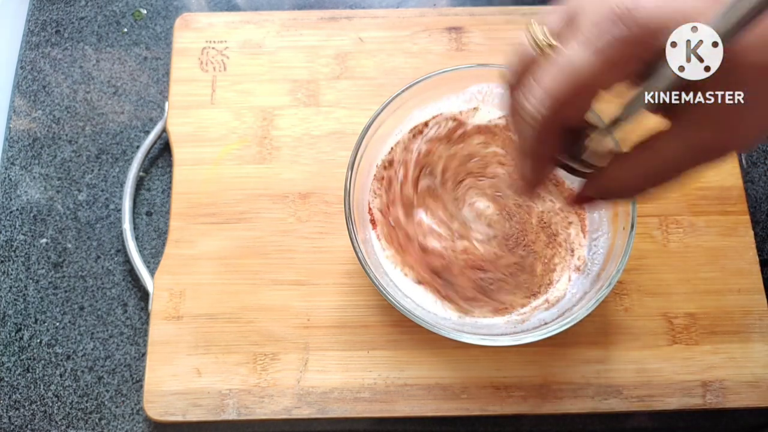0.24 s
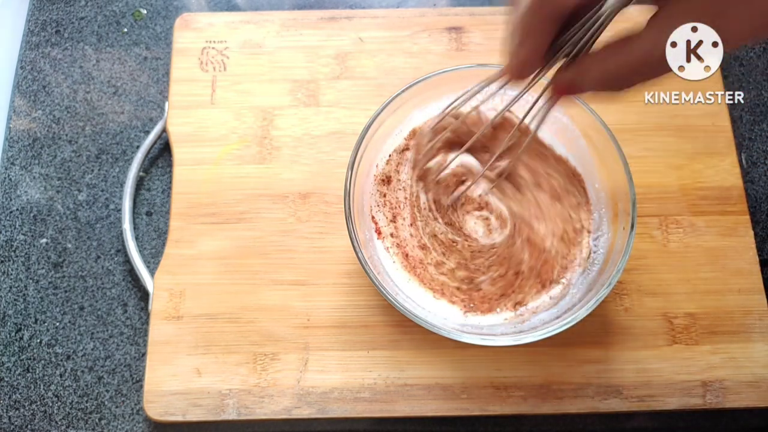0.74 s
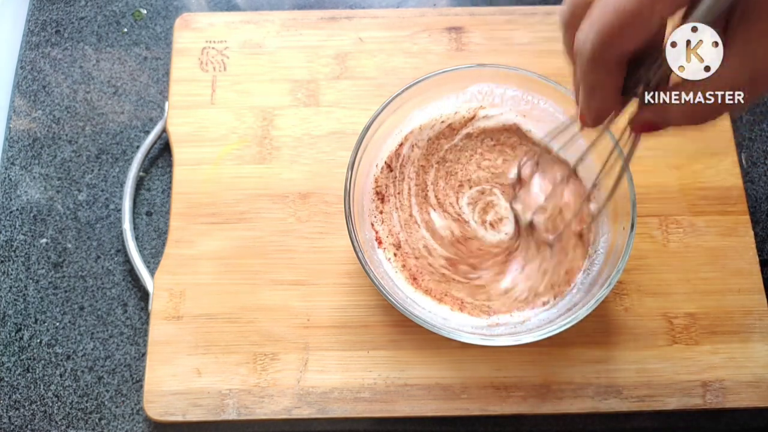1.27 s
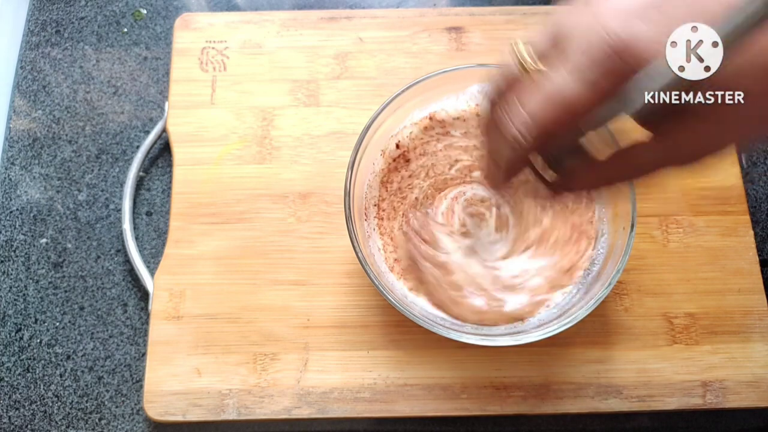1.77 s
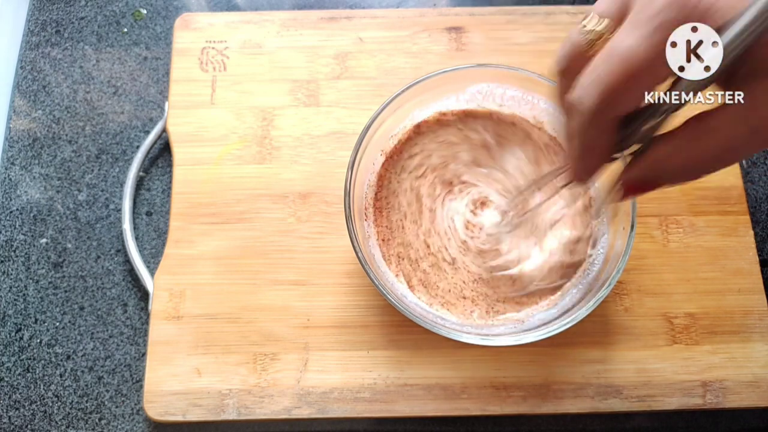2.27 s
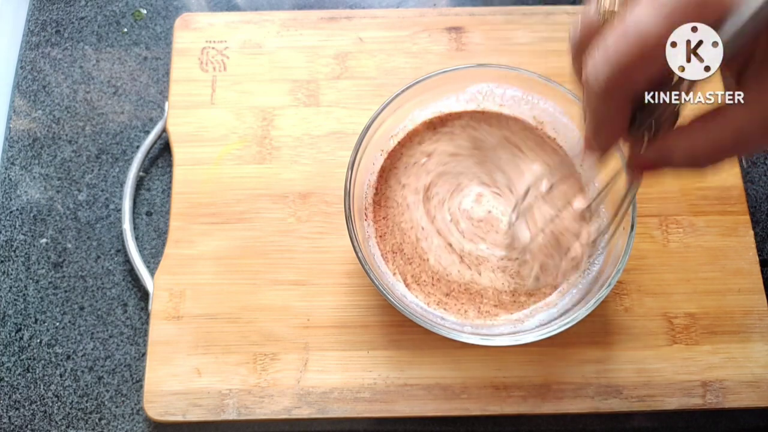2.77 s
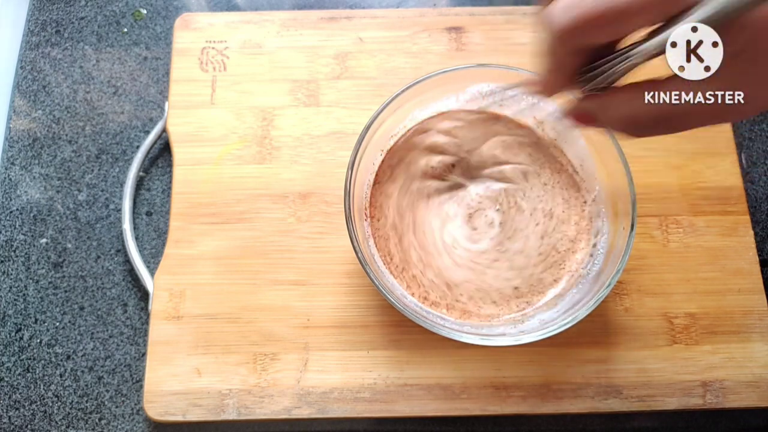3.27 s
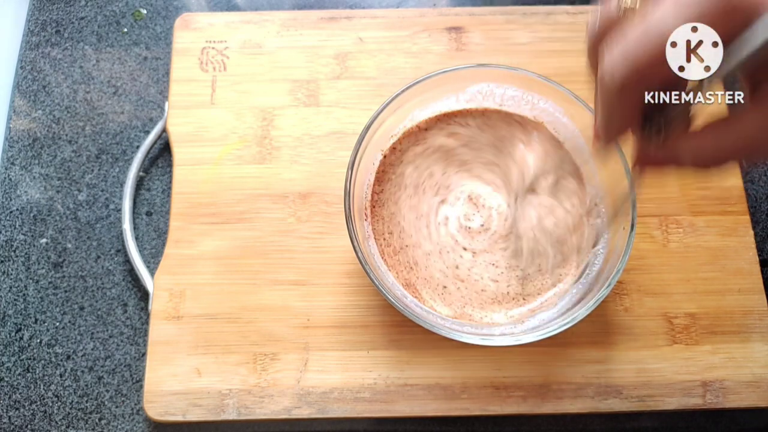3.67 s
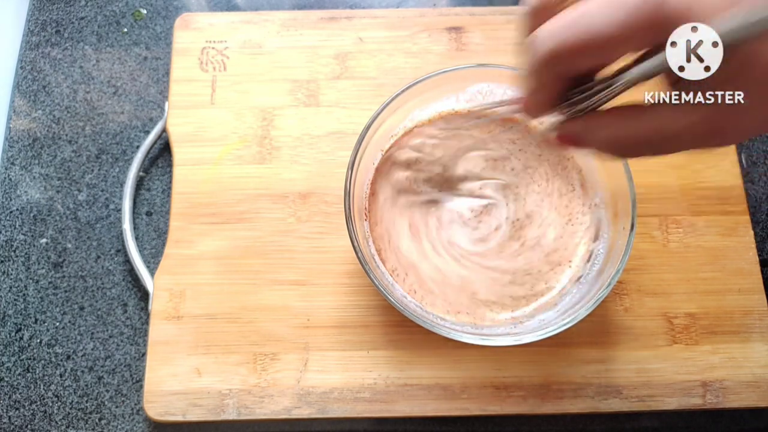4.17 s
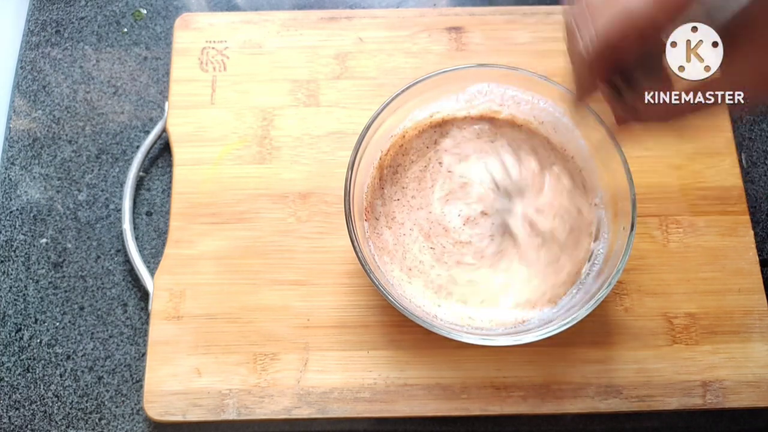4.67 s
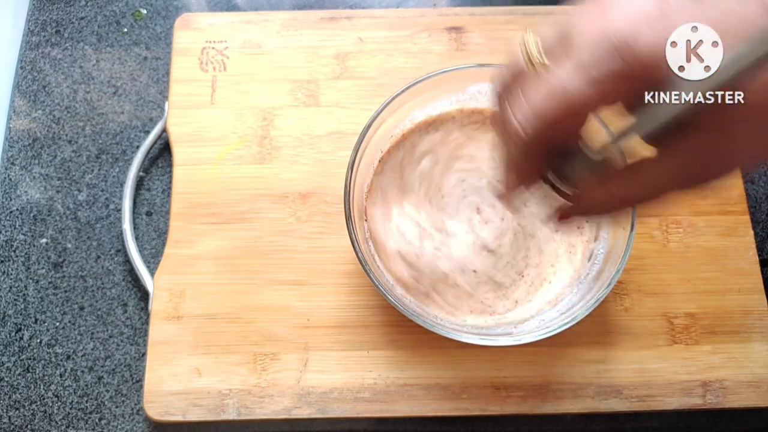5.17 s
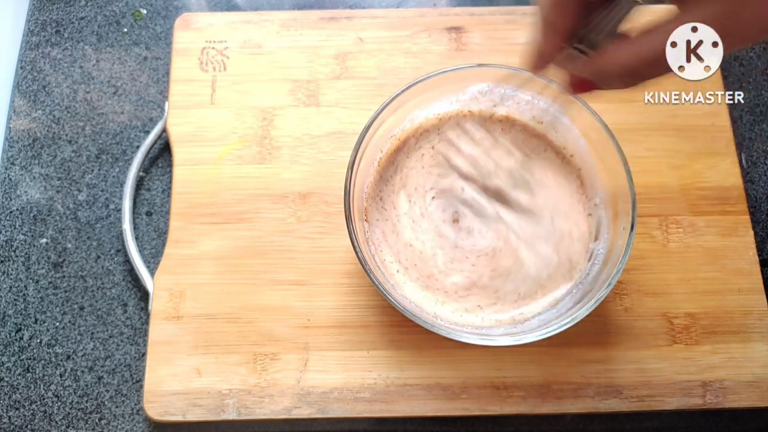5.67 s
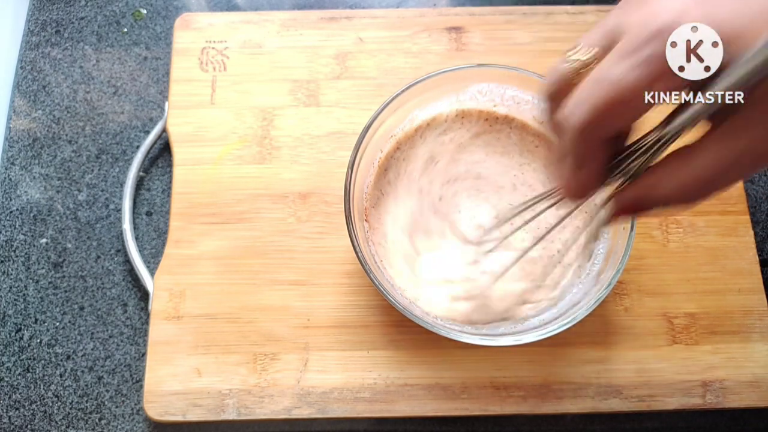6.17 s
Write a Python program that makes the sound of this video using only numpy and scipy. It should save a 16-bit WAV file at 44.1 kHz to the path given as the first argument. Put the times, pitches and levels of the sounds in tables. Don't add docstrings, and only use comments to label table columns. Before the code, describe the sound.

A phone-like stereo microphone close to a glass bowl catches quick, uneven whisking: light brushes, sharp metallic ticks, duller belly knocks and thin wire scraping. Short clear glass rings overlap the damped thuds of the board underneath. Taps are lighter in the middle, then strongest around five seconds, and carry on to the end over a low, pulsing kitchen hum and a brief far motor.

```python
import sys
import numpy as np
from scipy import signal
from scipy.fft import rfft, irfft, next_fast_len
from scipy.io import wavfile
from scipy.ndimage import uniform_filter1d

SR = 44100
rng = np.random.default_rng(int(sys.argv[2]) if len(sys.argv) > 2 else 0)


def inscribe(sig):
    pcm = np.round(np.clip(np.atleast_2d(sig).T, -1, 1) * 32767)
    wavfile.write(sys.argv[1], SR, pcm.astype(np.int16))


def voltage_ratio(decibels):
    exponent = np.asarray(decibels, float) / 20
    return 10 ** exponent


N = 283601
TIME = np.arange(N) / SR

# start_s, tick_db, knock_db, main_ring_db, third_ring_db
RIM_STRIKES = [(0.8939, -29.5, -29, -34.5, -37), (1.0465, -35.5, -34, -47, -43.5),
               (1.0929, -70, -51.5, -43, -47.5), (1.1857, -40.5, -33.5, -36.5, -51),
               (2.0133, -27, -33.5, -34, -42), (2.141, -46.5, -38, -37.5, -38.5),
               (2.9921, -41, -43.5, -46, -68), (3.5381, -40.5, -51, -81, -54.5),
               (3.5922, -51, -39.5, -55, -54), (3.7364, -34.5, -45, -73, -58),
               (3.8327, -49.5, -42, -45.5, -46.5), (4.5106, -41, -35, -41.5, -54),
               (4.7716, -46.5, -45, -45, -48.5), (4.9187, -25, -29, -30, -34.5),
               (4.9285, -37, -31, -35, -36.5), (5.2395, -23.5, -30.5, -27.5, -34),
               (5.2475, -44, -32, -24, -41.5), (5.3976, -57, -47, -42, -44.5),
               (5.5707, -29, -36, -39.5, -35), (6.044, -51, -51.5, -63, -46),
               (6.097, -40, -40.5, -39, -52.5), (6.2118, -30.5, -39.5, -39, -41),
               (6.3355, -52, -43, -48, -48), (6.4112, -39, -47, -36, -58)]
# start_s, tick_db, knock_db, main_ring_db, third_ring_db
BELLY_STRIKES = [(0.5886, -46.5, -40, -40.5, -66), (0.7372, -54, -46, -37.5, -55),
                 (0.752, -53, -52, -38.5, -43.5), (1.3733, -49, -52.5, -45, -67),
                 (1.44, -77, -57, -51.5, -78), (1.5519, -36, -40, -37.5, -48),
                 (1.7744, -45, -55.5, -47.5, -58), (1.8861, -57, -49.5, -52, -78),
                 (2.3037, -45.5, -42, -44.5, -56), (2.4109, -40.5, -37.5, -44.5, -41),
                 (2.5745, -39, -48, -41.5, -57), (4.0582, -34.5, -49, -44.5, -47),
                 (4.1041, -50, -58, -57, -58), (4.1255, -31.5, -47.5, -42, -39.5),
                 (4.1934, -49.5, -47, -47.5, -53), (4.6019, -38.5, -43.5, -52, -72),
                 (4.8294, -71, -52, -55, -59), (5.1053, -29, -36, -37, -32.5),
                 (5.7573, -44.5, -51, -65, -44)]


def tone(x, table, column=1):
    rows, size = np.array(table, float), next_fast_len(N)
    hz = np.maximum(np.fft.rfftfreq(size, 1 / SR), 1)
    gain_db = np.interp(np.log(hz), np.log(rows[:, 0]), rows[:, column])
    return irfft(rfft(x, size) * voltage_ratio(gain_db), size)[:N]


def unit(x):
    return x / np.sqrt(np.mean(np.abs(x) ** 2))


def smooth_twice(x, size):
    return uniform_filter1d(uniform_filter1d(x, size), size)


def sine(hz, phase=0):
    return np.sqrt(2) * np.sin(2 * np.pi * hz * TIME + phase)


def ring(x, hz, t60):
    pole = np.exp((2j * np.pi * hz - np.log(1000) / t60) / SR)
    return signal.lfilter([1], [1, -pole], x, axis=-1)


def blows(times, sizes):
    x = np.zeros((2, N), complex)
    x[:, np.clip((times * SR).astype(int), 0, N - 1)] = sizes
    return x


def walk(rate):
    hold = int(SR / rate)
    steps = np.repeat(rng.standard_normal(N // hold + 1), hold)
    return 0.83 * smooth_twice(steps, hold)[:N]


def spin(count, spread):
    common, apart = rng.standard_normal((count, 2)).T
    return np.exp(1j * (9 * common + spread * apart * np.array([[.5], [-.5]])))


def throb_level():
    # peak_s, level_db
    swells = [(0.07, -59), (0.25, -53.5), (0.41, -53), (0.64, -56), (0.82, -63), (1.02, -55), (1.23, -55.5),
              (1.45, -51.5), (1.65, -56), (1.86, -48.5), (2.58, -49.5), (2.76, -54), (2.89, -54),
              (3.08, -50), (3.23, -58), (3.6, -55), (3.78, -59), (4.12, -55), (4.5, -57.5), (4.75, -48),
              (5.1, -58), (5.57, -50), (5.96, -49.5), (6.14, -55.5)]
    rest_db, swell_s = -59, 0.055
    return voltage_ratio(rest_db) + sum(voltage_ratio(db) * np.exp(-((TIME - s) / swell_s) ** 2) for s, db in swells)


def kitchen():
    # pitch_hz, level_db (per Hz)
    rumble_colour = [(25, -22), (45, -14.5), (70, -3.5), (150, 2), (330, -4.5), (480, -10), (660, -20.5),
                     (960, -17), (1700, -27), (2600, -36.5)]
    # pitch_hz, level_db, width_hz
    hum_lines = [(194.7, -71.5, 15), (297, -59.5, 4.1), (339.9, -58, 14.4), (436, -68, 0.88)]
    # time_s, level_db
    motor_swell = [
        (2.05, -84),
        (2.14, -52.5),
        (2.49, -52),
        (2.6, -74),
    ]
    # pitch_hz, level_db
    motor_lines = [(488.8, -63), (732.5, -78)]

    mid, side = (tone(rng.standard_normal(N), rumble_colour) for _ in range(2))
    side = tone(side, [(100, -12.0), (250, -15.5), (500, 2.5), (900, 1.0)])
    rumble_level = voltage_ratio(-50.5 + 1.0 * walk(4.1))
    out = rumble_level * (mid + side * np.array([[1], [-1]])) / np.std(mid)
    for hz, db, width_hz in hum_lines:
        narrow = unit(ring(rng.standard_normal(N), hz, 2.3 / width_hz))
        out += np.sqrt(2) * voltage_ratio(db) * narrow.real
    out += voltage_ratio(np.interp(TIME, *np.transpose(motor_swell))) * sine(194.5)
    out += throb_level() * voltage_ratio(-0.9) * sine(99, 1.4 * walk(7))
    for hz, db in motor_lines:
        out += voltage_ratio(db + 0.76 * walk(4.4)) * sine(hz, 0.26 * walk(3.73))
    return out


def thumps():
    # start_s, level_db
    bumps = [(0.588, -35.5), (0.893, -35.5), (1.186, -44), (2.014, -35), (2.141, -38.5), (2.302, -37.5),
             (2.409, -48), (3.736, -34), (4.058, -36.5), (4.51, -38), (4.919, -40), (5.106, -54),
             (5.239, -43), (5.568, -50), (6.211, -58)]
    # pitch_hz, level_db, t60_s
    board_modes = [(351, -3, 0.086), (610, -13.5, 0.034)]
    s, db = np.transpose(bumps)
    return sum(voltage_ratio(over_db) * ring(blows(s, voltage_ratio(db)), hz, t60).imag for hz, over_db, t60 in board_modes)


def touches():
    # start_s, tick_db, knock_db, main_ring_db
    ruled_taps = [(0.0005, -60, -45.5, -34), (0.066, -51.5, -45, -43.5), (0.402, -52, -55.5, -81),
                  (0.4698, -46.5, -53, -53), (0.7003, -49, -69, -59), (1.499, -61, -66, -55),
                  (1.9584, -47, -71, -67), (2.2439, -44, -54, -48), (2.5187, -47.5, -46, -76),
                  (2.6938, -78, -77.5, -49.5), (2.7965, -45, -49, -91), (3.0964, -45.5, -73, -74),
                  (3.1892, -47.5, -68, -86), (3.2588, -44.5, -66, -45.5), (3.3867, -44.5, -60, -63),
                  (3.697, -48, -69.5, -73), (3.7776, -47.5, -80.5, -63), (4.005, -44, -63, -75),
                  (4.285, -50, -59, -53.5), (5.022, -45.5, -48, -45), (5.0649, -66, -55, -49),
                  (5.0848, -59, -70, -42.5), (5.346, -42.5, -54, -38.5), (5.4969, -77, -59.5, -46.5),
                  (5.5403, -57, -60.5, -44), (5.7309, -41.5, -44.5, -48), (5.8541, -53, -51, -53)]
    rim_low_db, belly_low_db, ruled_low_db = -14.5, -4, -16
    ruled_third_db = -13.5
    rows = []
    for strikes, low_db in ((RIM_STRIKES, rim_low_db), (BELLY_STRIKES, belly_low_db)):
        for s, tick, knock, main, third in strikes:
            rows.append((s, tick, knock, knock + low_db, main, third))
    for s, tick, knock, main in ruled_taps:
        rows.append((s, tick, knock, knock + ruled_low_db, main, main + ruled_third_db))
    return np.transpose(sorted(rows))


def wire_grit():
    # pitch_hz, level_db (per Hz)
    grit_colour = [(400, -11), (900, 4), (2200, 10), (3500, 3), (4100, 0), (5200, 2), (16000, 1)]
    return unit(np.array([tone(rng.standard_normal(N), grit_colour) for _ in range(2)]))


def scrape_level():
    # time_s, scrape_db
    stir = [(0, -55), (.43, -61), (.8, -58.5), (.99, -55.5), (1.3, -57.5), (1.66, -58.5), (1.97, -59),
            (2.2, -55), (2.76, -60.5), (3.13, -60.5), (3.33, -59), (3.72, -60.5), (4.24, -58.5),
            (4.44, -67.5), (4.78, -57.5), (5.2, -54.5), (5.94, -60), (6.32, -56)]
    stir_db = np.interp(TIME, *np.transpose(stir))
    return voltage_ratio(stir_db + 0.99 * walk(12) + 3.0 * walk(60))


def slips(rate, spread_db):
    when, size = rng.random((int(rate * N / SR), 2)).T
    puffs = blows(when * N / SR, voltage_ratio(-spread_db * np.log(1 - size)))
    return uniform_filter1d(ring(puffs, 0, 0.016).real, size=30)


def scraping(grit, scrape):
    return scrape * grit * (voltage_ratio(3) + voltage_ratio(-31) * slips(9.1, 4.0))


def rolled(s, sizes, soft, hz):
    roll_s = .0035
    step = np.round(roll_s * hz) / hz
    first = blows(s, sizes * (1 - soft))
    second = blows(s + step, sizes * soft)
    third = blows(s + 2 * step, sizes * soft / 2)
    return first + second + third


def knocks(s, knock_db, low_db, tick_db):
    # pitch_hz, over_knock_db, t60_s
    dull_modes = [(725, -22, 0.037), (1230, -21, 0.11), (1640, -14.5, 0.059), (1875, -5, 0.035),
                  (2103, 6, 0.022), (2099, 0.5, 0.071), (2393, -10, 0.049), (3100, -37, 0.021),
                  (3385, -5.5, 0.056)]
    # pitch_hz, over_lowest_ring_db, t60_s
    clack = (1018, 7.4, 0.042)
    soft = 0.6 * np.clip((knock_db - tick_db) / 10, 0, 1)
    clack_hz, clack_db, clack_t60 = clack
    clack_sizes = voltage_ratio(low_db + clack_db) * spin(len(s), 0.54)
    out = ring(rolled(s, clack_sizes, soft, clack_hz), clack_hz, clack_t60)
    for hz, over_db, t60 in dull_modes:
        scatter_db = 2.36 * rng.standard_normal(len(s))
        sizes = voltage_ratio(knock_db + over_db + scatter_db) * spin(len(s), hz / 1500)
        out += ring(rolled(s, sizes, soft, hz), hz, t60)
    return 1.08 * uniform_filter1d(out.imag, size=5)


def ticks(s, tick_db, grit):
    chime_hz = [5195, 6126, 7214, 9442, 11960, 14700, 15330]
    # over_tick_db, t60_s
    chime_decays = [(-21, 0.12), (-27, 0.036), (-22, 0.068), (-20.5, 0.067), (-24.5, 0.13), (-37, 0.22),
                    (-33, .1)]
    push = blows(s + 0.00088, voltage_ratio(tick_db))
    crack = ring(push, 0, 0.0079)
    rattle = voltage_ratio(-14.0) * ring(push, 0, 0.035)
    tail = voltage_ratio(-32.0) * ring(push, 0, 0.22)
    brightness = [(4000, -3.5), (9000, 3), (13000, 10), (16000, 5)]
    bright_grit = np.array([tone(port, brightness) for port in grit])
    out = bright_grit * smooth_twice((crack + rattle + tail).real, 40)
    for hz, (over_db, t60) in zip(chime_hz, chime_decays):
        scatter_db = 4 * rng.standard_normal(len(s))
        sizes = voltage_ratio(tick_db + over_db + scatter_db) * spin(len(s), 4.3)
        out += ring(blows(s, sizes), hz, t60).imag
    return out


def lean():
    struck_db, rest_db, swing_s = -9, 3, 0.14
    s = np.sort([0] + [row[0] for row in RIM_STRIKES + BELLY_STRIKES])
    since = TIME - s[np.clip(np.searchsorted(s, TIME) - 1, 0, None)]
    pan_db = rest_db + (struck_db - rest_db) * np.exp(-since / swing_s)
    return uniform_filter1d(pan_db, size=200) - 0.5 * walk(10)


def glass(s, knock_db, ring_db, pan_db, scrape):
    glass_hz = [970, 2132, 3530]
    # t60_s, left_lead_radians, scrape_driven_db
    glass_rings = [(0.2, 2.17, -5), (0.39, 1.77, 2), (0.27, 1.16, -5)]
    pan_shares = (.2, 1, .3)
    last = np.clip(np.searchsorted(s + 0.00087, TIME) - 1, 0, None)
    firm = np.clip((knock_db + 60.0) / 18, 0, 1)
    out = 0
    for hz, (t60, lead, rub_db), db, swing in zip(glass_hz, glass_rings, ring_db, pan_shares):
        turn = np.cumsum(firm * 1.264 * rng.standard_normal(len(s)))
        state = voltage_ratio(db[last] - 60 * (TIME - s[last]) / t60) * np.exp(1j * turn[last])
        state = uniform_filter1d(state.real, size=150) + 1j * uniform_filter1d(state.imag, size=150)
        waver = voltage_ratio(1.8 * walk(45)) * np.exp(.4j * walk(25))
        carrier = np.exp(1j * (2 * np.pi * hz * TIME + np.array([[lead], [0]])))
        struck = np.sqrt(2) * state * waver * carrier
        rubbed = voltage_ratio(rub_db) * scrape * unit(ring(rng.standard_normal((2, N)), hz, t60 / 3))
        left = 1 / (1 + voltage_ratio(-2 * swing * pan_db))
        out = out + np.sqrt(2 * np.array([left, 1 - left])) * (struck + rubbed).real
    return out


def scene():
    s, tick_db, knock_db, *ring_db = touches()
    grit, scrape = wire_grit(), scrape_level()
    whisk = voltage_ratio(2.0) * ticks(s, tick_db, grit)
    whisk += scraping(grit, scrape)
    whisk += voltage_ratio(1) * knocks(s, knock_db, ring_db[0], tick_db)
    bowl = glass(s, knock_db, ring_db, lean(), scrape)
    return whisk + bowl + thumps() + kitchen()


def band_limit(x):
    return signal.sosfilt(signal.butter(12, 16640, fs=SR, output="sos"), x)


def record(dry):
    # pitch_hz, left_db, right_db
    port_colours = [(196, -2.5, -2.5), (510, -5, 1), (630, 1, -1), (3800, -1.5, 1), (6400, -0.5, 2.5),
                    (7400, -9, 1.5), (9770, -2.5, -0.5), (11750, 3, -23), (11500, 8.5, -10),
                    (13000, 6.5, -11.5), (15450, 1.5, -8), (15500, -15, 3), (16350, -11, -18),
                    (16800, -60, -60)]
    left = tone(dry[0], port_colours, column=1)
    right = tone(dry[1], port_colours, column=2)
    return band_limit(np.array([left, right]))


dry = scene()
out = record(dry)
inscribe(out)
```